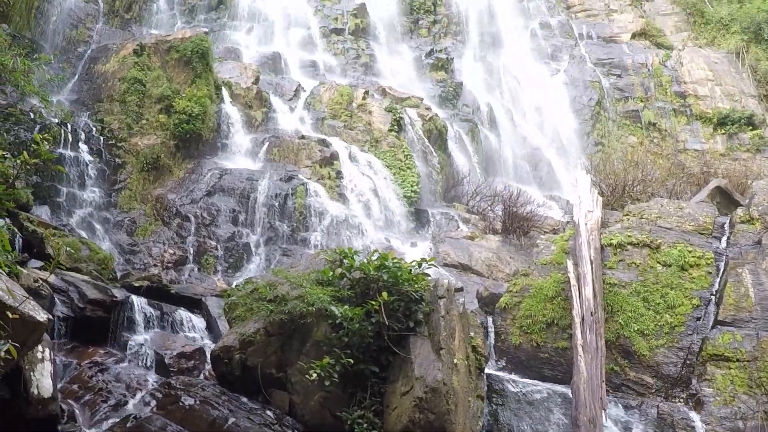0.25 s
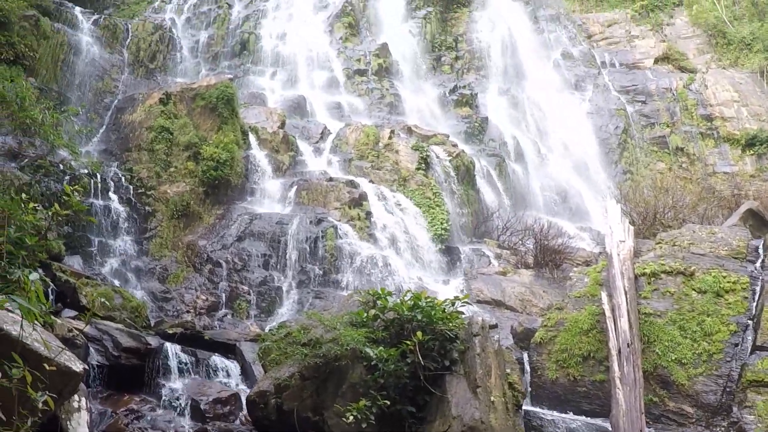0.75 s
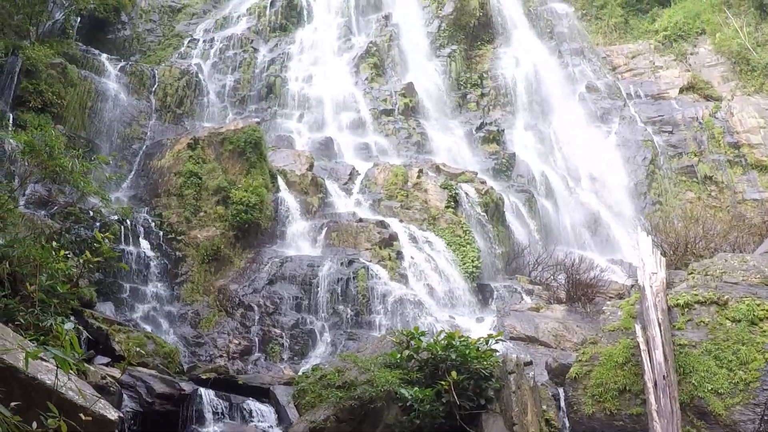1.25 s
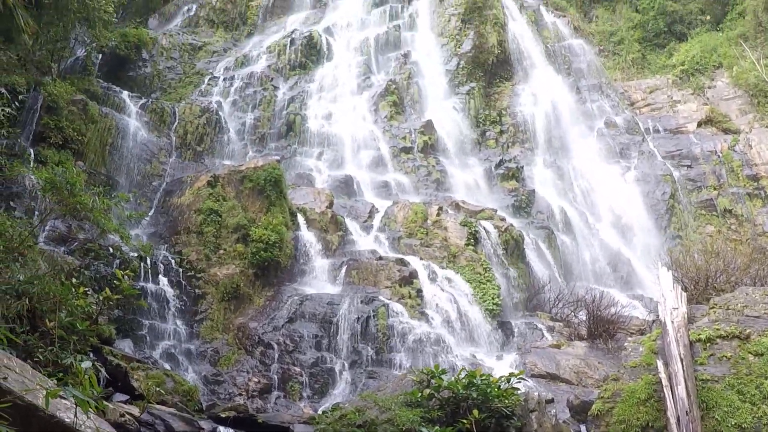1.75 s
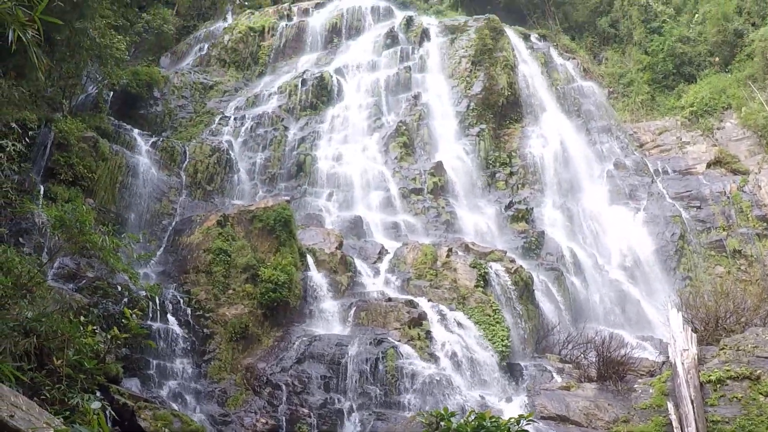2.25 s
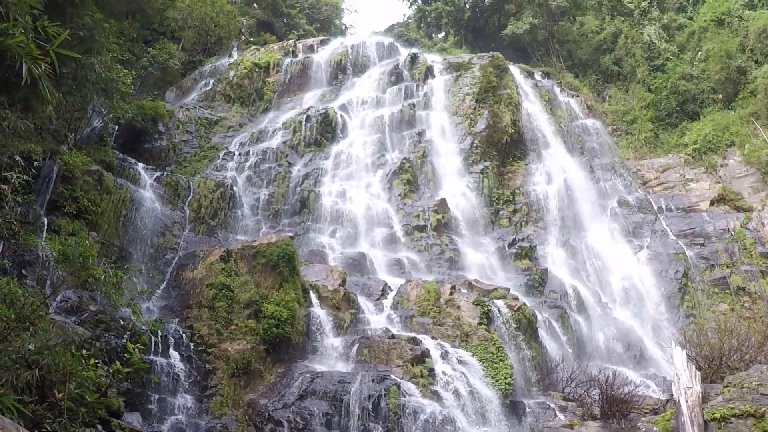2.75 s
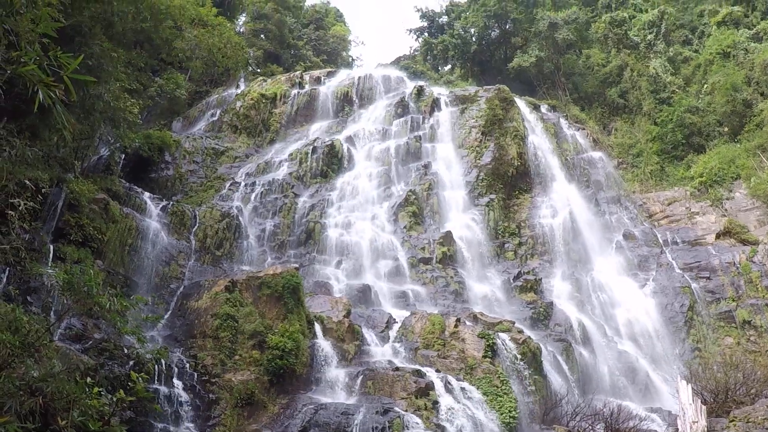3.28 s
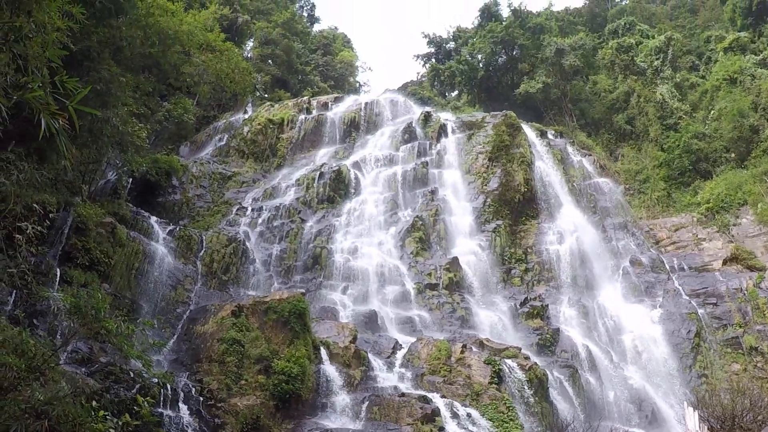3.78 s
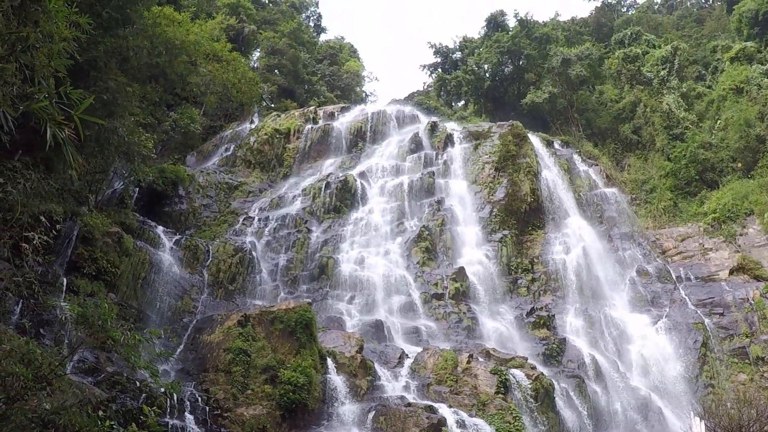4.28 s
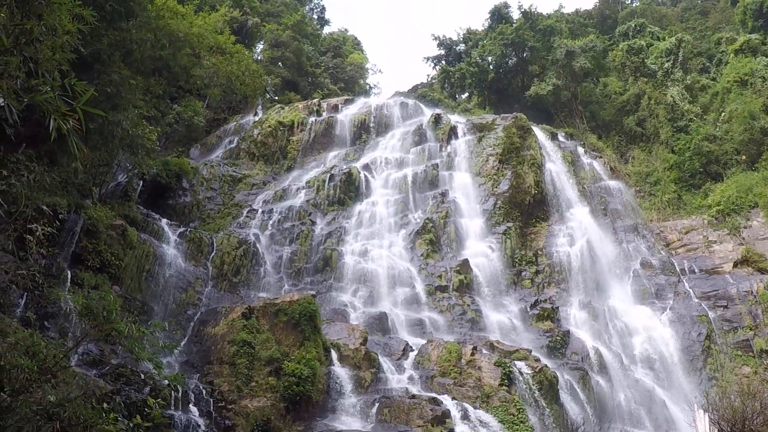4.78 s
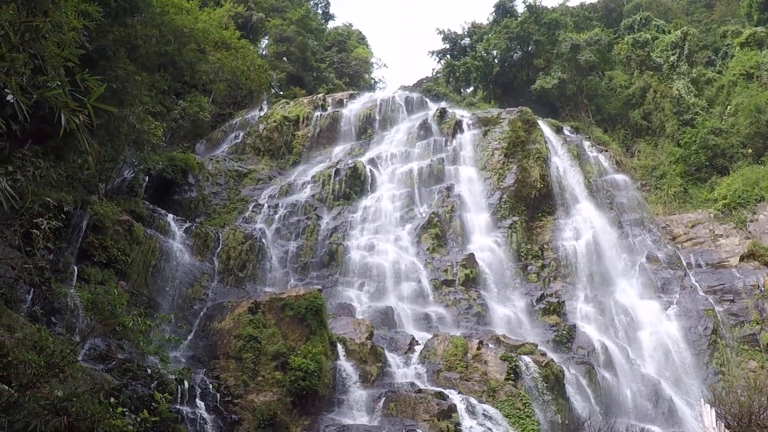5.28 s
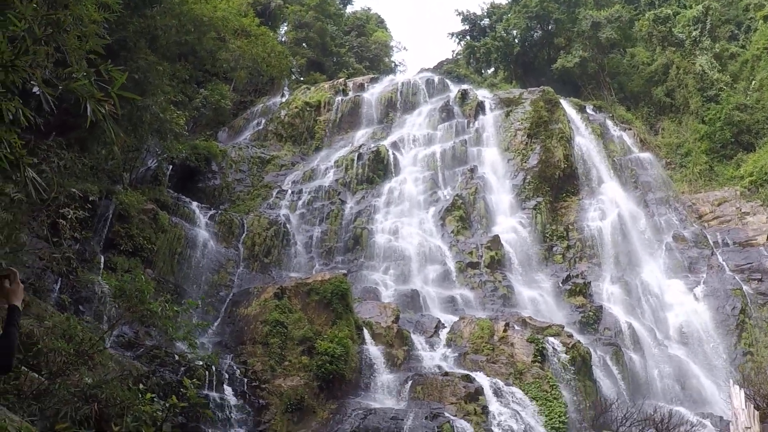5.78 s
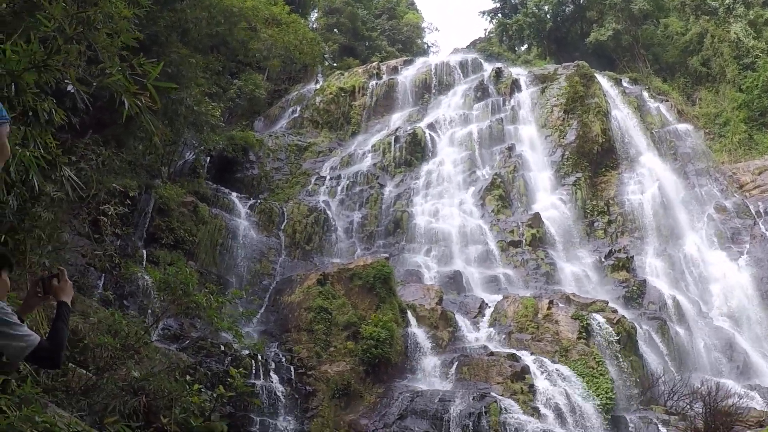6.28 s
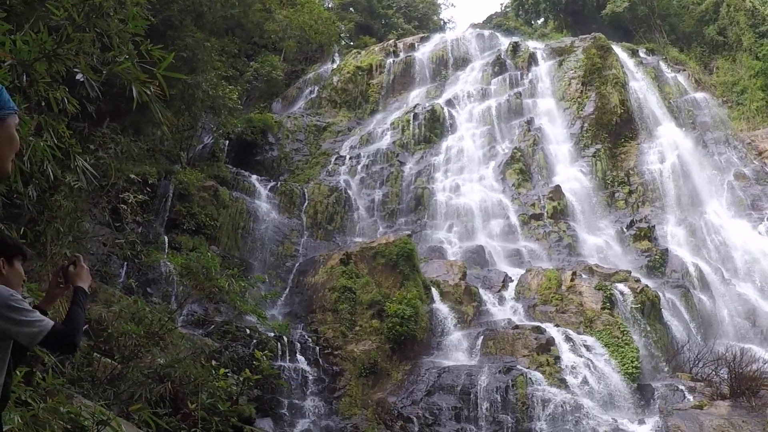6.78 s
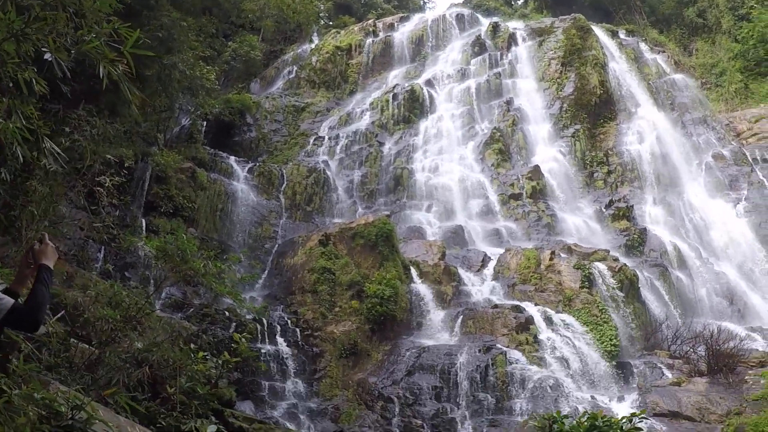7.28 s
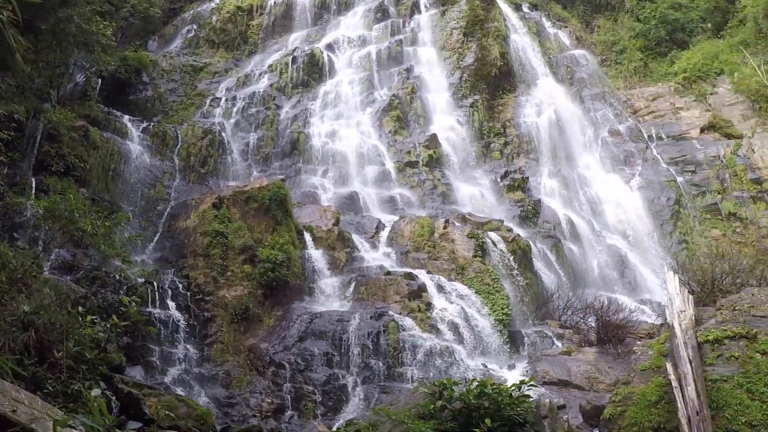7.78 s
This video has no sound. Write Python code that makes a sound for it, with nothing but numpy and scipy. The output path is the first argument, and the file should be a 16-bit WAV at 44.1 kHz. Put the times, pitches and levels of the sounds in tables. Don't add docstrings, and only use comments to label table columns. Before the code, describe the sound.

Outdoors in a forest, a tall waterfall pours over rock as a continuous smooth hiss and mid-range roar. A small hand-held camera in a hard housing picks up irregular dull thumps from the grip, strongest in the middle. A low wind rumble presses on the microphone at first, then dies away. The sound opens muffled and mono, then spreads into wider, brighter stereo.

```python
import sys
import numpy as np
from scipy import signal
from scipy.io import wavfile
from scipy.ndimage import uniform_filter1d

SR = 44100
rng = np.random.default_rng(int(sys.argv[2]) if len(sys.argv) > 2 else 0)


def convert_level_to_amplitude(level_db):
    exponent = np.asarray(level_db, float) / 20
    return 10 ** exponent


def output_pcm(signal):
    pcm = np.clip(np.atleast_2d(signal).T, -1, 1) * 32767
    wavfile.write(sys.argv[1], SR, np.round(pcm).astype(np.int16))


N = 354563


def evened(x):
    return x / np.sqrt(np.mean(x ** 2) + 1e-20)


def read(points, hz):
    f, *columns = np.transpose(points)
    return [np.interp(np.log(hz + 1), np.log(f), c)[:, None] for c in columns]


def curve(rows, t):
    s, *columns = np.transpose(rows)
    return [np.interp(t, s, c) for c in columns]


def add(mix, s, sound):
    part = mix[:, round(s * SR):][:, :sound.shape[1]]
    part += sound[:, :part.shape[1]]


def ports_share(t):
    fade_start_s, fade_s = 0.41, 1.0
    return 1 - np.exp(-np.maximum(t - fade_start_s, 0) / fade_s)


# frequency in Hz, left and right level in
# dB per Hz.
PORTS_DB = [(43, -82.7, -106), (87, -114, -102), (147, -64.5, -72.5), (215, -67.5, -71.5), (385, -71, -80),
            (560, -71, -77), (874, -67.5, -64.5), (998, -66.5, -65.0), (1368, -66.5, -55.5),
            (1468, -70, -58), (1636, -75, -67.5), (1744, -63, -66), (2040, -67.5, -66), (2360, -73.5, -68),
            (2411, -73, -67.5), (2635, -66, -68), (3010, -73.5, -70.5), (3100, -63.5, -68.5),
            (3600, -66.5, -66), (4000, -70.5, -71), (4110, -66.5, -70), (4340, -67, -65),
            (4800, -68.5, -65.5), (4720, -68, -66.5), (5200, -66.5, -65), (6100, -67.5, -76),
            (6630, -67, -72.5), (7670, -73.5, -74.5),
            (7680, -74.5, -77.5), (8250, -79.5, -88), (8450, -83.5, -80.5), (8880, -81, -82.5),
           (9680, -85, -84.5), (10920, -94.5, -99), (11460, -101.9, -101.8), (11660, -101.5, -95.5),
           (12489, -93.5, -99.5), (13700, -102.9, -103.0), (14700, -101.1, -101.8), (15073, -109.6, -110.4)]
# frequency in Hz, likeness of the two sides 0-1, left
PORTS_PAIR = [(43, 0.86, 0.1), (86, 0.67, 0.2), (150, 0.56, 0.3), (215, 0.7, 0.3), (387, 0.32, 0.2),
              (538, 0.71, -2.4), (861, 0.96, -2.1), (990, 0.93, -2.5), (1356, 0.94, -3.0),
              (1485, 0.85, -2.7), (1636, 0.72, -3.1), (1744, 0.76, 1.7), (2024, 0.72, 0.3),
              (2347, 0.26, -1.8),
              (2411, 0.24, -2.3), (2583, 0.33, 2.3), (2928, 0.02, 1.3), (3186, 0.64, 0.9),
              (3617, 0.71, 0.2), (3919, 0.5, -0.3), (4134, 0.43, 0.1), (4349, 0.57, 1.4), (4565, 0.7, -3.0),
              (4694, 0.5, -2.5), (5167, 0.53, -3.0), (5986, 0.31, -1.8), (6933, 0.68, 2.6),
              (7579, 0.49, -2.4),
              (7751, 0.4, -2.6), (8096, 0.28, -2.7), (8699, 0.26, -0.1), (9130, 0.05, 2.2),
             (9733, 0.34, -0.8), (10938, 0.47, -0.1), (11197, 0.56, 0.0), (11800, 0.31, 0.3),
             (12489, 0.49, 0.0), (13436, 0.31, 3.1), (13953, 0.01, 2.7), (15073, 0.12, -0.0)]
# frequency in Hz, level in dB
# per Hz.
SHELTERED_DB = [(172, -73), (430, -80), (689, -80), (861, -76.4), (1033, -76.5), (1378, -67),
                (1464, -68.5), (1722, -76.5), (2153, -71), (2411, -73), (2842, -80),
                (3190, -75), (4050, -82), (4350, -81.5), (4700, -85), (5400, -88), (6500, -85.5),
                   (7400, -92.5), (7750, -91), (8300, -96.5), (10160, -102), (11280, -107)]
# frequency in Hz, likeness -1 to 1.
FOLLOWS = [(300, 0.64), (800, 0.69), (1350, 0.97), (1900, -0.074), (3600, -0.64), (5000, 0.45),
           (6500, 0.24), (9000, 0.0058)]
# time in seconds, level in dB.
FLOW = [
    (0, 1.5),
    (3, 0),
    (4, 0.3),
    (5.3, 0.76),
    (7, -1),
    (8.1, 1),
]


def water():
    patchy_db, swell_db = 0.35, 0.07
    low_swing = 1.3
    split_hz, top_db = 11500, -5.0
    hz, t, (a, b, c) = signal.stft(rng.standard_normal((3, N)), SR, nperseg=1024, noverlap=768)

    left_db, right_db = read(PORTS_DB, hz)
    f, like, lead = np.transpose(PORTS_PAIR)
    real, imag = read(np.c_[f, like * np.cos(lead), like * np.sin(lead)], hz)
    left = a * convert_level_to_amplitude(left_db)
    right_own = np.sqrt(1 - real ** 2 - imag ** 2 + 1e-9) * b
    right = ((real - 1j * imag) * a + right_own) * convert_level_to_amplitude(right_db)
    ports = np.array([left, right])

    follows = np.clip(read(FOLLOWS, hz)[0], -1, 1)
    mono_db = read(SHELTERED_DB, hz)[0]
    mono = (follows * a + np.sqrt(1 - follows ** 2) * c) * convert_level_to_amplitude(mono_db)

    share = ports_share(t)
    sheltered = np.where(hz[:, None] > split_hz, convert_level_to_amplitude(top_db) * ports, mono)
    both = share * ports + (1 - share) * sheltered

    patches = rng.standard_normal((len(t), len(hz))).T
    patches = uniform_filter1d(patches, size=12, axis=0)
    patches = evened(uniform_filter1d(patches, size=16, axis=1))
    swell = evened(uniform_filter1d(rng.standard_normal(len(t)), size=20))
    high = np.clip(np.log2(hz[:, None] / 500 + 1e-9) / 3, 0, 1)
    swing = low_swing * (0.5 - high) + high
    both = both * convert_level_to_amplitude(swing * curve(FLOW, t)[0] + patchy_db * patches + swell_db * swell)
    return np.sqrt(SR) * signal.istft(both, SR, nperseg=1024, noverlap=768)[1][:, :N]


KNOCK_LEFT_DB = 13


def knock(db, hz, pan_db, tick_db):
    ring_s, ring_lag_s = 0.0031, 0.0018
    glide = .28
    tick_hz, tick_s, tick_lag_s = 600, 0.00047, 0.00251
    sheltered_tick = 1.7
    t = np.arange(2000) / SR

    u = np.maximum(t - ring_lag_s, 0)
    turns = hz * (u + glide * ring_s * (1 - np.exp(-u / ring_s)))
    ring = -u / ring_s * np.exp(1 - u / ring_s) * np.sin(2 * np.pi * turns)

    u = np.maximum(t - tick_lag_s, 0)
    in_ports = np.clip(pan_db / KNOCK_LEFT_DB, 0, 1)
    tick_s = tick_s * (sheltered_tick + (1 - sheltered_tick) * in_ports)
    tick = -u / tick_s * np.exp(1 - u / tick_s) * np.sin(2 * np.pi * tick_hz * u)

    ring_sides = np.array([[convert_level_to_amplitude(pan_db)], [1]]) * 2 / (1 + convert_level_to_amplitude(pan_db))
    tick_sides = np.array([[1 - pan_db / 4.4], [convert_level_to_amplitude(0.34 * pan_db)]])
    return convert_level_to_amplitude(db) * (ring_sides * ring + convert_level_to_amplitude(tick_db) * tick_sides * tick)


# start in seconds, peak level in dB, ring in Hz, tick level in dB relative to the ring.
TILT_KNOCKS = [(0.304, -29, 157, -7), (0.349, -23.5, 151, -5), (0.475, -19.5, 157, -6),
               (0.57, -21, 158, -5), (0.601, -21, 151, -2.5), (0.835, -22.5, 193, -8),
               (0.922, -26, 180, -9), (0.975, -25, 190, -5), (1.467, -28.5, 191, -7), (1.706, -31, 180, -9),
               (1.913, -24.5, 168, -7), (2.112, -29, 193, -7), (2.221, -26.5, 178, -7),
               (2.343, -30, 209, -9), (2.565, -29, 203, -7), (2.657, -24, 179, -8)]
HELD_KNOCKS = [(2.813, -19, 178, -1), (2.948, -19, 182, -14), (2.973, -21.5, 174, -9),
               (3.082, -20, 179, -7), (3.427, -25, 190, -6), (3.547, -17.5, 174, -14),
               (3.612, -26.5, 166, -9), (3.952, -15, 191, -5), (4.042, -26, 195, -9),
               (4.189, -20.5, 187, -5), (4.351, -24.5, 174, -8), (4.493, -13, 185, -3),
               (4.953, -18, 185, -4), (5.118, -19, 183, -6), (5.257, -27, 164, -13),
               (5.319, -24.5, 185, -10), (5.411, -23.5, 169, -7), (5.776, -28, 200, -7),
               (5.86, -25.5, 215, -7), (5.949, -24.5, 166, -10), (6.008, -27, 189, -10),
               (6.083, -23.5, 196, -11), (7.517, -22, 190, -12), (7.634, -27, 185, -7)]
# time in seconds, level in dB.
GRIP = [
    (0, -3),
    (2.5, -1),
    (6.2, 3),
    (6.6, -4),
    (8.1, -1),
]


def handling():
    per_s, faint_db, spread_db, faint_left_db = 14, -43, 3, 9
    out = np.zeros((2, N))
    for s, db, hz, tick_db in TILT_KNOCKS + HELD_KNOCKS:
        add(out, s, knock(db, hz, KNOCK_LEFT_DB * ports_share(s), tick_db))
    for at, size, pitch in rng.random((300, 3)):
        s = at * 300 / per_s
        if s < N / SR:
            db = faint_db + curve(GRIP, s)[0] - spread_db * np.log(size + 0.036)
            add(out, s, knock(db, 160 + 70 * pitch, faint_left_db * ports_share(s), -12))
    return out


def jolts():
    half_width_s, lag_s, left_db = .0024, 0.0053, 6
    jolt_db, follows = -47, .1
    out = np.zeros((2, N))
    u = (np.arange(2000) / SR - lag_s) / half_width_s
    push = (1 - u ** 2) * np.exp(-u ** 2 / 2)
    for s, db, *_ in TILT_KNOCKS + HELD_KNOCKS:
        sides = np.array([[1], [convert_level_to_amplitude(-left_db * ports_share(s))]])
        add(out, s, convert_level_to_amplitude(jolt_db + follows * (db + 25)) * sides * push)
    return out


# time in seconds, level in dB.
WIND = [(0, -41), (.55, -37.5), (1.0, -44), (1.85, -42.5), (2.45, -51), (3.3, -57), (4.4, -67), (5.0, -58),
        (5.45, -59), (6.15, -51), (7.0, -62), (8.04, -71)]
# frequency in Hz, level in dB per Hz.
WIND_COLOUR = [(8, -13), (14, -1), (45, 3.5), (70, -2), (100, -4), (140, -22), (250, -80)]


def wind():
    lumpy_db, apart = 1.6, 0.37
    hz, _, z = signal.stft(rng.standard_normal((2, N)), SR, nperseg=4096)
    z = z * convert_level_to_amplitude(read(WIND_COLOUR, hz)[0])
    common, own = signal.istft(z, SR, nperseg=4096)[1][:, :N]
    t = np.arange(N) / SR
    lumps = uniform_filter1d(rng.standard_normal(N), size=1200)
    lumps = evened(uniform_filter1d(lumps, size=1200))
    own = apart * ports_share(t) * evened(own)
    level = convert_level_to_amplitude(curve(WIND, t)[0] + lumpy_db * lumps - 2)
    return level * (evened(common) + np.array([own, -own]))


def high_pass(x, hz):
    sos = signal.butter(8, hz, "high", fs=SR, output="sos")
    return signal.sosfiltfilt(sos, x, padtype="even", padlen=4000)


def low_cut(x):
    ports, sheltered = high_pass(x, 128), high_pass(x, 86)
    ports = ports + convert_level_to_amplitude(-32) * (x - ports)
    share = ports_share(np.arange(N) / SR)
    return share * ports + (1 - share) * sheltered


def thin_treble(x):
    start_hz, depth_db, mono_db = 7800, -1.2, -25
    lead = 136
    padded = np.pad(x, ((0, 0), (lead, 0)))
    hz, t, z = signal.stft(padded, SR, nperseg=2048, window="cosine")
    power = uniform_filter1d((abs(z) ** 2).mean(0), size=3, axis=0)
    power_db = 10 * np.log10(power + 1e-30)
    local_db = uniform_filter1d(power_db, size=60, axis=0)
    local_db = uniform_filter1d(local_db, size=12, axis=1)
    mono = 1 - np.clip(4 * ports_share(t), 0, 1)
    weak = (power_db < local_db + depth_db + mono_db * mono) & (hz[:, None] > start_hz)
    return signal.istft(z * ~weak, SR, nperseg=2048, window="cosine")[1][:, lead:][:, :N]


def scene():
    return low_cut(water() + handling()) + wind() + jolts()


def roll_off(x):
    return signal.sosfilt(signal.butter(12, 15210, fs=SR, output="sos"), x)


def record(dry):
    return roll_off(thin_treble(dry))


dry = scene()
out = record(dry)
output_pcm(out)
```